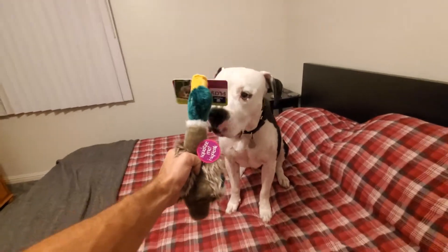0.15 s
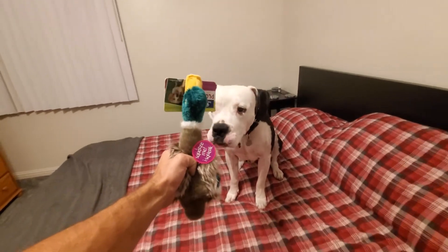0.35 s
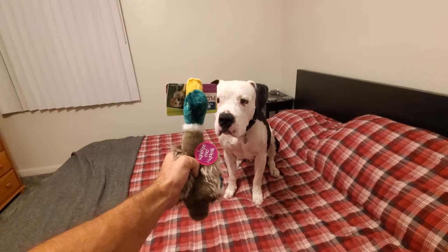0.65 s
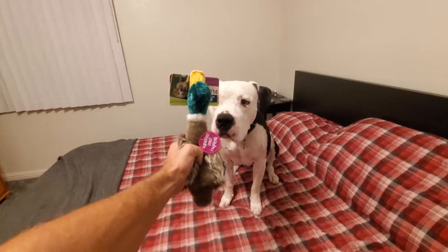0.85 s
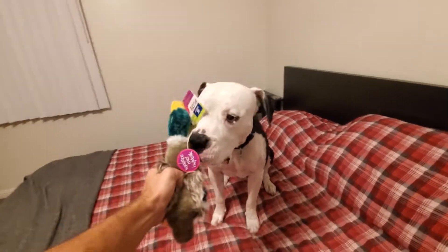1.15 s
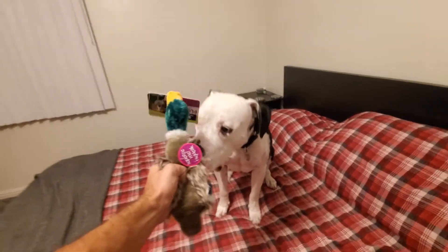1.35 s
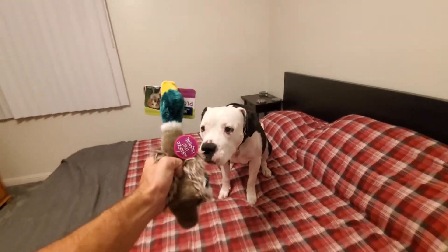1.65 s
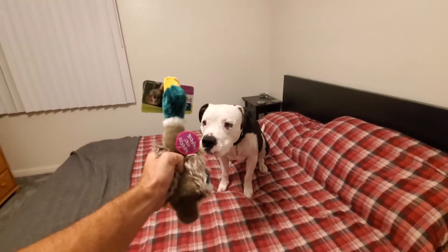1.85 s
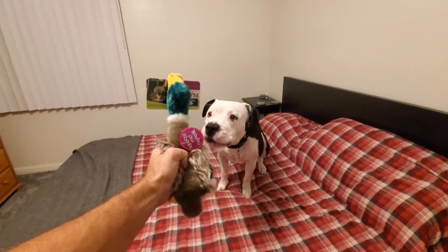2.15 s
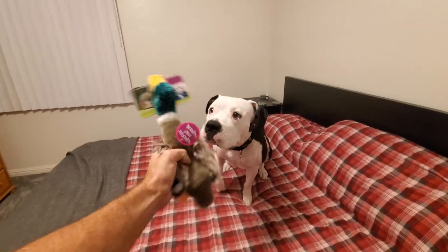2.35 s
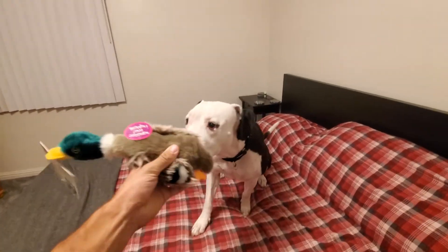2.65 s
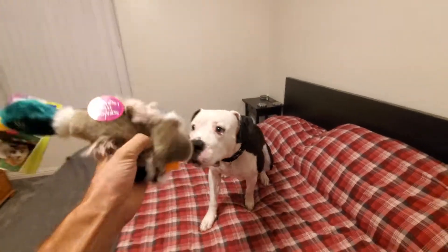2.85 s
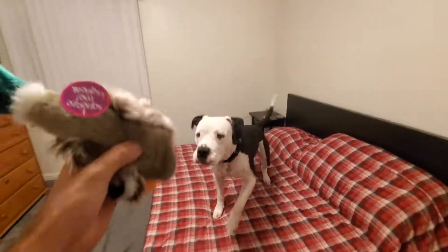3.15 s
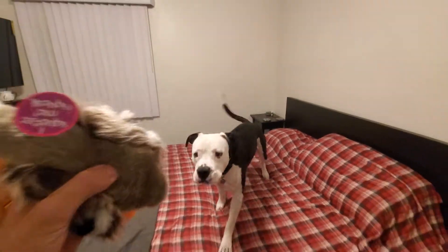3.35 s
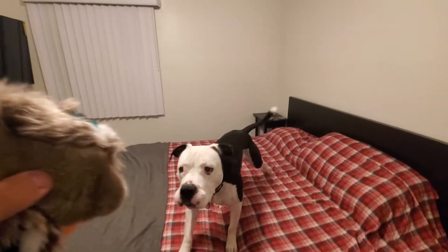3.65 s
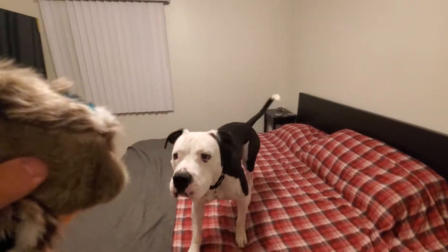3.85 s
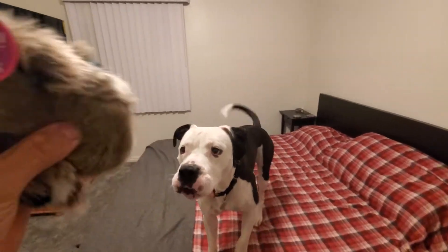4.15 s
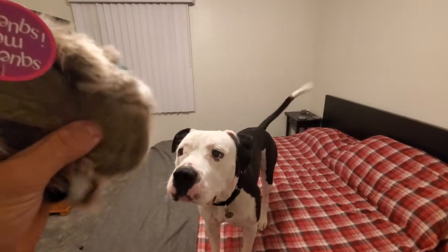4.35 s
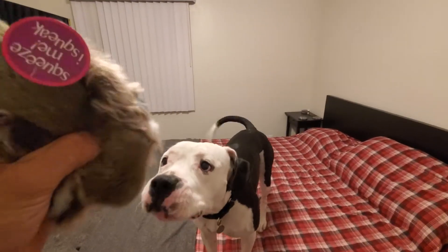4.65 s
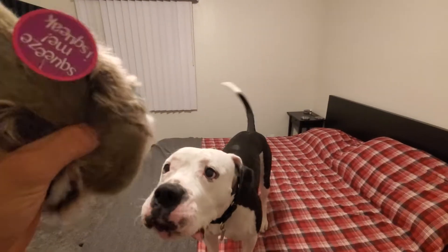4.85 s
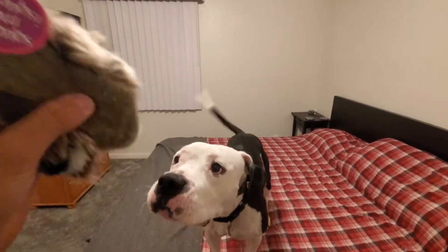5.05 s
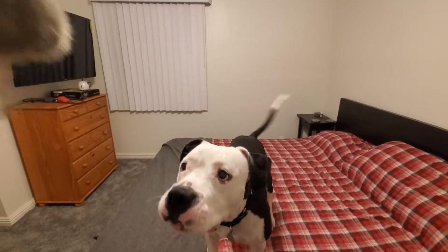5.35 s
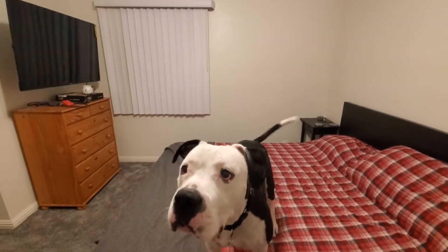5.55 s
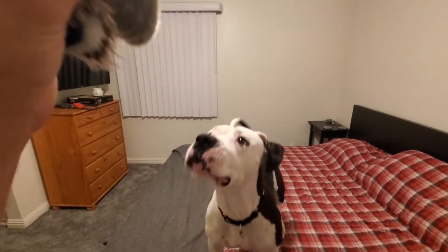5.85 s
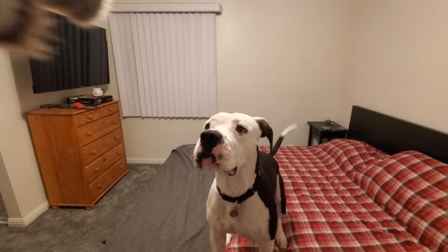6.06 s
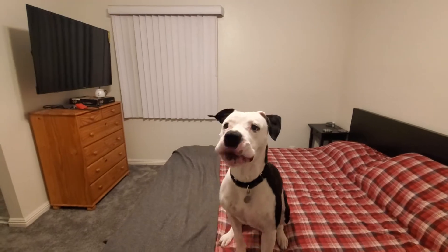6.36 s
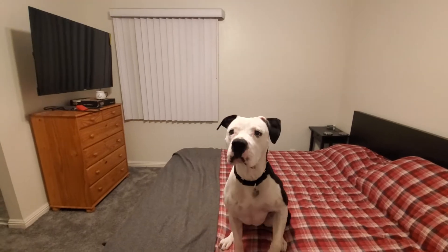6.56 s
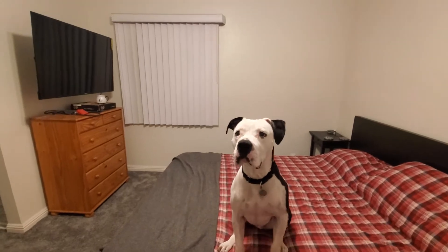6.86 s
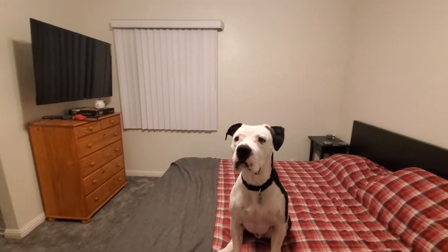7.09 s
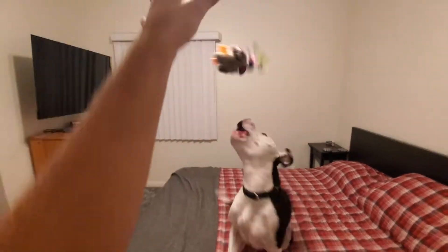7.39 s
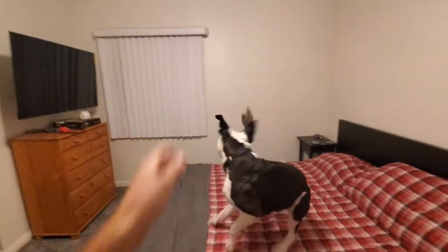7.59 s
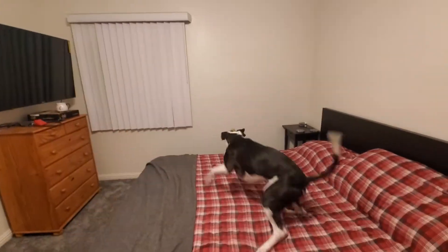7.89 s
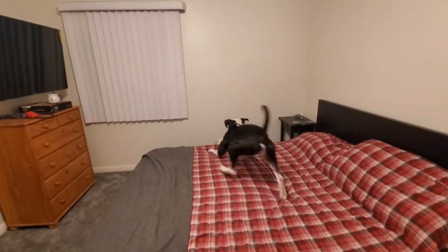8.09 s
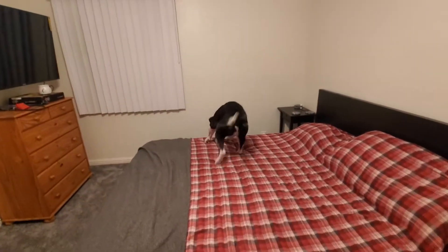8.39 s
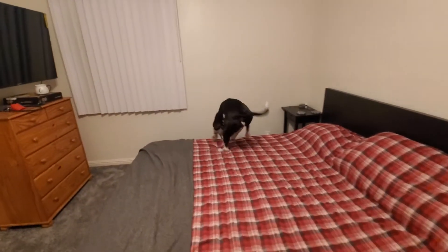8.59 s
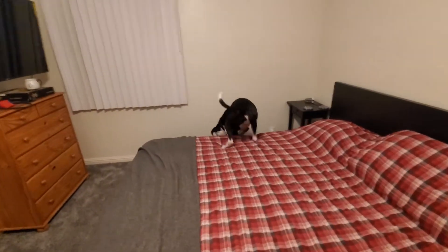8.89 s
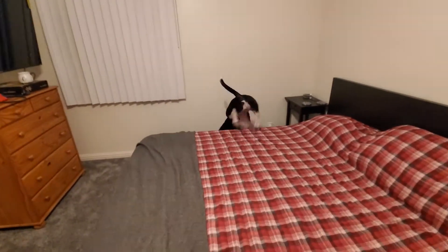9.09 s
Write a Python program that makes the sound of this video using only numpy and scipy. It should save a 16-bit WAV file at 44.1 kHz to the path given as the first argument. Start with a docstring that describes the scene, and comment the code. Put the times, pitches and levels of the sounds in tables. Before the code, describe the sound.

Paws thump a mattress and fabric rustles, then short rising toy squeaks, alone and in a quick run; the tossed toy flops down amid faint jingling.

```python
"""Cloth rustle, ticks of a card label and paw thumps on a mattress open the scene, in a small bedroom.
A plush duck's reed squeaker is then squeezed nine times close by: harmonics of a gliding pitch plus reed hiss.
The toy is thrown: the dog jumps, its collar tags jingle (ringing modes), the toy lands with a noise slap.
Cloth is gated, resonated noise; thumps are decaying sines; most near sounds also feed a synthetic room tail.
Table levels are relative: each function adds its own trim."""
import sys
import numpy as np
from scipy import signal
from scipy.fft import rfft, irfft, next_fast_len
from scipy.io import wavfile
from scipy.ndimage import uniform_filter1d, minimum_filter1d

SR = 44100
rng = np.random.default_rng(int(sys.argv[2]) if len(sys.argv) > 2 else 0)


def store_pcm(level_fs):
    """Save levels as 16-bit WAV."""
    pcm = np.round(np.clip(level_fs, -1, 1) * 32767).astype(np.int16)
    wavfile.write(sys.argv[1], SR, np.atleast_2d(pcm).T)


N = 407043
TIME = np.arange(N) / SR

# hand squeezes: start_s, rise_s, let_go_s (both after start), top_hz (before any register jump),
# level_db, left_right_db, room_send_db
SQUEEZES = [ (2.752, .041, .043, 1525, -11.3, -3.5, 1.5), (2.976, .032, .038, 1790, -8.8, -3.5, 1),
            (3.987, .032, .047, 1765, -10.6, -1, 0), (4.199, .027, .048, 1675, -10, -1, -1),
            (4.395, .028, .050, 1785, -10, -2.5, -.5), (4.589, .035, .052, 1680, -10, -1, -1.5),
            (4.785, .031, .055, 1600, -10.2, 0, 0), (5.601, .042, .051, 2010, -6.7, 1, -5),
            (7.140, .036, .049, 2400, -7.2, 1, -2.5)]
# side the bass comes from: time_s, left_right_db
BASS_LEAN = [(0, 12.5), (3.1, 9), (4.5, 1), (8.35, -1), (8.7, 5), (8.95, 7.5), (9.08, -4)]


def from_db(db):
    """Decibels to gain."""
    return 10 ** (np.asarray(db) / 20)


def rms_one(x):
    """Scale to an rms of 1."""
    return x / np.sqrt(np.mean(x ** 2) + 1e-20)


def at_hz(points, hz):
    """Read a (Hz, value) table on a log-frequency axis."""
    f, value = np.transpose(points)
    return np.interp(np.log(np.maximum(hz, 1)), np.log(f), value)


def in_time(curve, s=TIME):
    """Read a (s, value) curve."""
    return np.interp(s, *np.transpose(curve))


def pan(db):
    """Left and right gains for a level difference."""
    return from_db(np.array([[db], [-db]]) / 2)


def add(out, s, x):
    """Mix x into out from time s on."""
    i = max(0, round(s * SR))
    out[..., i:i + x.shape[-1]] += x[..., :N - i]


def drift(rate_hz, n):
    """Slow chance: straight lines between random knots of spread 1."""
    knots = rng.standard_normal(int(n / SR * rate_hz) + 3)
    return np.interp(np.arange(n) / SR * rate_hz, np.arange(len(knots)), knots)


def colour(x, spectrum):
    """Give x a (Hz, dB) spectrum that falls away beyond its ends; rms 1."""
    size = next_fast_len(x.shape[-1])
    f = np.fft.rfftfreq(size, 1 / SR) + 1
    skirts = np.minimum(1, f / spectrum[0][0]) ** 3 * np.minimum(1, spectrum[-1][0] / f) ** 3
    shaped = irfft(rfft(x, size) * from_db(at_hz(spectrum, f)) * skirts, size)
    return rms_one(shaped[..., :x.shape[-1]])


def resonate(x, hz, width_hz):
    """One resonance of the given bandwidth."""
    return signal.lfilter(*signal.iirpeak(hz, hz / width_hz, fs=SR), x)


def stereo_noise(n, alike_below_hz):
    """Diffuse noise: alike at both ears in the bass, unrelated in the treble."""
    mid, side = rng.standard_normal((2, n))
    low, high = (signal.butter(1, alike_below_hz, kind, fs=SR) for kind in ("low", "high"))
    bass = signal.lfilter(*low, rng.standard_normal(n))
    wide = signal.lfilter(*high, side) * np.array([[1], [-1]])
    return (mid + bass + wide) / np.sqrt(2)


def struck(modes, t):
    """One blow: every (Hz, dB, t60 s) mode rings with a strength of its own."""
    return sum(from_db(db + 2 * rng.standard_normal() - 60 * t / t60) * np.sin(2 * np.pi * hz * t)
               for hz, db, t60 in modes)


def squeaker(toy_db=0.7, overtones_side_db=0.5, start_hz=1225, sag_hz_per_s=2800):
    """Each squeeze climbs from one pitch to its own top, then sags until let go; direct sound and room send."""
    # share of the climb done at half time, less for hard squeezes: top_hz, share
    climb_bow = [(1700, .63), (2400, .47)]
    # lead of the left channel as the toy swings: time_s, lead_s
    left_lead = [(2.75, .00028), (2.98, .00033), (3.98, .000385), (4.8, .00039), (7.14, .00037)]
    direct, sent = np.zeros((2, 2, N))
    for s, rise, let_go, top, db, side_db, room_db in SQUEEZES:
        halfway = start_hz + at_hz(climb_bow, top) * (top - start_hz)
        pitches = start_hz, halfway, top, top - sag_hz_per_s * (let_go - rise)
        overtones = pan(overtones_side_db - side_db)
        reed = squeak(rise, let_go, pitches, overtones, in_time(left_lead, s))
        sound = from_db(db + toy_db) * pan(side_db) * reed
        add(direct, s, sound)
        add(sent, s, from_db(room_db) * sound)
    return direct, sent


def squeak(rise, let_go, pitches, overtones, lead, slack_hz=1080, slump_s=0.0053, fade_s=0.0057,
           attack_s=0.0016, jitter=0.0028, waver_db=4.0, hiss_db=-21, dulling=0.26, rasp_rad=0.064,
           pure_db=-9, start_db=-3, jump_hz=2330, jump_ratio=1.125, beam_order=4):
    """Air pressure drives the reed up in pitch; on letting go the pitch slumps and the overtones die first."""
    # radiation through the plush: pitch_hz, level_db
    radiated = [(1000, -9.5), (1250, -3.5), (1500, -3), (2150, -1), (2480, -10.5), (2750, -7),
                (3100, -15.5), (3550, -7), (4200, -13.5), (7400, -18.5), (8800, -24.5), (9600, -32),
                (14500, -34), (16500, -38.5)]
    # air hissing past the reed: pitch_hz, level_db
    reed_hiss = [(1100, -11), (1500, -4), (2050, -11.5), (2900, -2), (4200, 5.5), (7500, 12), (9500, -10),
                 (15000, -15)]
    t = np.arange(round((let_go + 2 * 0.022) * SR)) / SR
    start, halfway, top, end = pitches
    rising = np.minimum(t / rise, 1)
    climb = np.polyval(np.polyfit([0, .5, 1], [start, halfway, top], 2), rising)
    held = climb + (end - top) * np.clip((t - rise) / max(let_go - rise, 1e-3), 0, 1)
    # once blown above jump_hz the reed stays in a higher register
    held = np.where(np.maximum.accumulate(held) > jump_hz, held * jump_ratio, held)

    after = np.maximum(t - let_go, 0)
    pressure = np.exp(-after / slump_s)
    hz = (slack_hz + (held - slack_hz) * pressure) * (1 + jitter * drift(900, len(t)))
    attack = (1 - np.exp(-t / attack_s)) * from_db(start_db * (1 - rising))
    blow = attack * np.exp(-(after / fade_s / 2) ** 2)

    # the reed shuts early or late on each cycle, which frays the high overtones
    phase = 2 * np.pi * np.cumsum(hz) / SR + rasp_rad * drift(1600, len(t))
    lagged = phase - 2 * np.pi * hz * np.array([[0], [lead]])
    hiss = colour(rng.standard_normal((2, len(t))), reed_hiss)
    out = from_db(hiss_db) * hiss * (1 + .5 * np.cos(lagged))
    # hard blowing gives a purer whistle
    overtones = overtones * from_db(pure_db * np.clip(held / 1900 - 1, 0, .5) * 2)
    for k in np.arange(1, 14):
        # each ear gets its own wavering share; the spread stops growing at beam_order
        spread_db = waver_db * np.sqrt(min(k, beam_order) - 3 / 4)
        beam = spread_db * np.array([drift(130, len(t)), drift(150, len(t))])
        share = 1 if k == 1 else overtones * pressure ** (dulling * (k - 1))
        level = share * from_db(at_hz(radiated, k * hz) + beam) * (k * hz < SR / 2)
        out += np.sqrt(2) * level * np.sin(k * lagged)
    return out * blow


def intakes(delay_s=0.066, length_s=.035, intake_db=-47):
    """A moment after each squeeze the bulb springs back and draws air in with a faint hiss."""
    # air drawn into the bulb: pitch_hz, level_db
    intake_colour = [(1500, -12), (3500, -2), (7000, -2), (11000, -3.5), (16000, -8)]
    out, t = np.zeros((2, N)), np.arange(SR // 4) / SR
    swell = np.exp(-(2 * (t - delay_s) / length_s) ** 2)
    for s, _, let_go, *_ in SQUEEZES:
        hiss = colour(rng.standard_normal((2, len(t))), intake_colour)
        add(out, s + let_go, from_db(intake_db) * swell * hiss)
    return out


def cloth(rub_db=-1, grain_db=2.0, snag_db=-9, snags_per_s=250, scrape_db=-7, wander_db=5, treble_hz=4500):
    """Fibres rub in a grainy hiss, snag now and then, and scrape with a shifting colour."""
    # resonances of the weave: pitch_hz, width_hz
    weave = [(1350, 1400), (2300, 360), (2750, 210), (3150, 300), (3600, 1600), (5200, 570), (7200, 2000)]
    # rubbing spectrum: pitch_hz, level_db
    rub_colour = [(350, -31), (600, -8.5), (1180, -5), (1750, -1.5), (2070, -2), (2870, -1.5), (4520, -7.5),
                  (7410, -11), (15100, -19), (16000, -32)]
    hiss = stereo_noise(N, 570) * from_db(grain_db * drift(200, N))
    snag_chance = snags_per_s * from_db(5 * drift(20, N)) / SR
    snags = (rng.random(N) < snag_chance) * rng.laplace(0, 1, (2, N))
    friction = rms_one(hiss) + from_db(snag_db) * rms_one(snags)
    scrapes = sum(resonate(friction, hz, width) * from_db(wander_db * drift(16, N)) for hz, width in weave)
    rub = colour(friction + from_db(scrape_db) * rms_one(scrapes), rub_colour)
    highs = signal.sosfiltfilt(signal.butter(2, treble_hz, "high", fs=SR, output="sos"), rub)
    body, treble = rubbing_gains()
    return from_db(rub_db) * (body * (rub - highs) + treble * highs) * pan(1.8)


def rubbing_gains(decay_db_per_s=150.5):
    """Strokes swell and die away on top of the resting contact, in power; gains of body and treble."""
    # plush sliding on hand, muzzle and bedding: time_s, level_db
    contact = [(0, -49.5), (.35, -63), (.76, -66.5), (1.02, -43), (1.8, -50), (2.22, -58), (2.55, -53),
               (3.15, -47.5), (3.65, -69.5), (4.9, -59), (5.55, -72), (6.4, -63), (6.95, -78.5), (7.6, -55),
               (8.55, -65), (9.23, -54.5)]
    # single strokes of cloth: peak_s, rise_s, level_db, treble_db (relative to the body)
    strokes = [(.085, .015, -45.5, -3), (.295, 0.01, -48.5, -11), (.48, 0.036, -54, -10),
               (.575, 0.016, -51.5, 4.5), (.88, 0.025, -50.5, 2.5), (1.01, 0.03, -43.5, 8.5),
               (1.21, 0.02, -43, -3), (1.28, 0.021, -39.5, -20), (1.36, 0.0082, -31.5, -10),
               (1.525, .02, -40, -3.5), (1.68, 0.036, -41.5, -21), (1.77, 0.089, -42, -26),
               (1.85, 0.018, -41.5, 0), (2.006, 0.02, -42.5, 3), (2.28, .03, -51.5, -17),
               (2.415, 0.035, -39.5, 5), (2.516, .015, -39, 6), (2.57, .02, -43.5, 0), (2.735, .02, -40, 3),
               (3.769, 0.046, -52, -8), (5.2, .03, -53, -3.5), (5.336, 0.016, -52.5, -2),
               (6.25, 0.067, -52, 0), (7.465, 0.0073, -45.5, -8), (7.785, 0.044, -52, 9),
               (8.098, 0.013, -34, 0), (8.719, 0.037, -47, -22), (9.12, 0.087, -51, -0.5)]
    body = treble = from_db(in_time(contact)) ** 2
    for s, rise, db, treble_db in strokes:
        swell = np.exp(-2 * (np.minimum(TIME - s, 0) / rise) ** 2)
        power = swell * from_db(db - decay_db_per_s * np.clip(TIME - s, 0, 1)) ** 2
        body, treble = body + power, treble + power * from_db(treble_db) ** 2
    return np.sqrt(body), np.sqrt(treble)


def ticks(t60=.012, tick_db=-8, ring_db=-4, width=0.13):
    """Label, plastic and teeth: each tick is a short crack with a broad resonance of its own."""
    # ticks: start_s, level_db, pitch_hz
    tick_list = [(0.074, -11.5, 2140), (1.1034, -24, 3660), (1.1356, -20, 2430), (1.3568, -35, 2890),
                 (2.348, -33, 2800), (2.387, -23.5, 2360), (2.4078, -16.5, 2980), (2.504, -13, 3150),
                 (2.544, -27, 3110), (2.6267, -29, 3030), (2.7164, -24, 5610), (2.738, -30, 2550),
                 (2.913, -27.5, 1530), (3.254, -17.5, 1796), (3.325, -24, 2480), (3.4672, -32.5, 2330),
                 (4.965, -28, 3480), (5.09, -35, 9100), (5.1502, -21, 12100), (5.76, -25, 10800),
                 (5.7666, -19, 1990), (5.778, -18.5, 1980), (5.9494, -32, 1975), (6.049, -36, 6800),
                 (6.104, -41, 2920), (6.6609, -42, 3330), (7.4634, -37.5, 2650)]
    # crack spectrum: pitch_hz, level_db
    tick_colour = [(290, -53), (500, -27), (2930, -7.5), (4280, -7), (5470, -6.5), (6900, -10),
                   (9630, -7.5), (16000, -12)]
    out, t = np.zeros((2, N)), np.arange(SR // 10) / SR
    for s, db, hz in tick_list:
        crack = colour(rng.standard_normal((2, len(t))), tick_colour)
        ring = rms_one(resonate(crack, hz, width * hz))
        add(out, s, from_db(db + tick_db - 60 * t / t60) * (crack + from_db(ring_db) * ring))
    return out * pan(1.9)


def slaps(attack_s=0.0035):
    """The toy lands and is nudged: plush and card slap in a burst of coloured noise."""
    # landings: start_s, level_db, t60_s
    landings = [(8.091, -30, 0.17), (8.472, -51.5, 0.13)]
    # slap spectrum: pitch_hz, level_db
    slap_colour = [(180, -41), (300, -20), (478, -15), (565, -26.5), (930, -3), (2100, -33), (2440, 1.5),
                   (2610, -21), (2930, -5), (16000, -26.5)]
    out, t = np.zeros((2, N)), np.arange(SR // 2) / SR
    for s, db, t60 in landings:
        envelope = from_db(db - 60 * t / t60) * (1 - np.exp(-t / attack_s))
        add(out, s, envelope * colour(stereo_noise(len(t), 870), slap_colour))
    return out * pan(-4.0)


def collar(shake_s=0.028, touch_db=-6, others_db=-15, reach_hz=350, count=3, chatter_db=-7,
           chatter_width_hz=350, chatter_t60=0.29):
    """A tag touches a few times and chatters on its ring; the spot hit decides which modes are favoured."""
    # tag touches: start_s, level_db, favoured_hz
    jingles = [(7.648, -40.5, 10030), (7.69, -46, 11700), (7.788, -36.5, 11580), (7.808, -47, 7100),
               (7.835, -47.5, 11450), (8.659, -51.5, 10940), (8.725, -58, 11200)]
    # tag modes: pitch_hz, level_db, t60_s
    tags = [(6560, -4, 0.18), (6900, -2.5, 0.13), (9300, -13, 0.2), (10030, -14, 0.14), (10840, 7, 0.1),
            (11420, 2.5, 0.39), (11500, 3, 0.32)]
    out, t = np.zeros((2, N)), np.arange(SR // 2) / SR
    soft = 1 - np.exp(-t / .003)
    for s, db, main_hz in jingles:
        modes = []
        for hz, level, t60 in tags:
            remoteness = 1 - np.exp(-((hz - main_hz) / reach_hz) ** 2)
            modes.append((hz, level + others_db * remoteness, t60))
        for delay in shake_s * (np.arange(count) * rng.uniform(0.52, 1.0, count)):
            ring = np.array([struck(modes, t), struck(modes, t)])
            add(out, s + delay, from_db(db + touch_db) * soft * ring)
        contacts = (rng.random((2, len(t))) < 500 / SR) * rng.standard_normal((2, len(t)))
        chatter = rms_one(resonate(contacts, main_hz, chatter_width_hz))
        add(out, s, from_db(db + chatter_db - 60 * t / chatter_t60) * soft * chatter)
    return out


def mattress(handling_colour, t60=0.14, attack_s=0.0051, thump_db=-1, second_db=-9, frame_db=-4,
             frame_t60=0.26, puff_db=-2):
    """A soft blow bounces the mattress in two modes, rings the frame and puffs the bedding."""
    # paws and body: start_s, level_db, pitch_hz, frame_knock_db
    thumps = [(0.171, -28, 70, -22), (.324, -28, 61.7, -21), (0.815, -22, 65, -28), (0.879, -29, 79.5, -16),
              (0.945, -20, 82.4, -15), (1.068, -16, 77, -5), (1.148, -26, 79.6, -0.5),
              (1.354, -32.5, 100, 2), (1.605, -20.5, 60.6, -24), (1.688, -27.5, 61.5, -10.5),
              (2.358, -28.5, 74, -16), (2.488, -36, 50, -17), (2.533, -24, 83, -14.5),
              (3.071, -24.5, 46.3, -25), (7.627, -24, 173, -6), (7.768, -27, 73, -10.5),
              (8.043, -28, 74.6, -4.5), (8.768, -27.5, 64, -14), (8.947, -23.5, 47.4, -36)]
    # bed frame modes: pitch_hz, level_db, t60_s (shortened further by frame_t60)
    bed = [(134, 9, 0.276), (236.5, 1, 0.23), (282, 0.5, 0.2), (384, -3, 0.2), (427.4, -1, 0.28),
           (481, -25, .2)]
    out, t = np.zeros((2, N)), np.arange(SR // 2) / SR
    swell = 1 - np.exp(-t / attack_s)
    for s, db, hz, knock_db in thumps:
        turn = 2 * np.pi * hz * t
        two_modes = np.sin(turn) - from_db(second_db) * np.sin(1.6 * turn)
        bounce = from_db(thump_db - 60 * t / t60) * two_modes
        puff = from_db(puff_db) * colour(stereo_noise(len(t), 780), handling_colour)
        knock = from_db(frame_db + knock_db - 60 * t / frame_t60) * (0.66 * struck(bed, t) + puff)
        add(out, s, from_db(db) * swell * (bounce * pan(in_time(BASS_LEAN, s)) + knock))
    return out


def bumps(t60=0.059, attack_s=0.0028, bump_db=-4, width=.4):
    """A soft touch of toy or hand sets one broad, low resonance going."""
    # hollow bumps: start_s, level_db, pitch_hz
    touches = [(.275, -33.5, 433), (4.155, -40, 370), (4.347, -33, 404), (4.555, -44, 340),
               (4.933, -29.5, 390), (5.02, -40, 473), (5.09, -39.5, 430), (5.61, -52, 430),
               (5.722, -49, 480), (7.283, -30, 490)]
    out, t = np.zeros((2, N)), np.arange(SR // 5) / SR
    for s, db, hz in touches:
        edges_hz = [hz / (1 + width / 2), hz * (1 + width / 2)]
        body = signal.butter(2, edges_hz, "band", fs=SR, output="sos")
        hollow = rms_one(signal.sosfilt(body, stereo_noise(len(t), 900)))
        add(out, s, from_db(db + bump_db - 60 * t / t60) * (1 - np.exp(-t / attack_s)) * hollow)
    return out


def movement(handling_colour, mean_rumble_db=-61.5, rumble_follows=0.83, heave_rumble_db=1,
             heave_bedding_db=1, stir_db=1, lump_db=3.5, crumple_db=3):
    """The mattress heaves in lumps under the dog, and bedding and plush are pushed about."""
    # stirring of bedding and plush: time_s, soft_noise_db
    stir_curve = [(0.0, -52.5), (0.74, -57), (1.16, -49.5), (2.18, -53.5), (2.6, -51.5), (3.96, -62.5),
                  (4.19, -57.5), (5.04, -58), (5.42, -64), (6.48, -64.5), (6.94, -67), (7.56, -53.5),
                  (8.04, -61), (8.17, -58), (8.64, -56.5), (9.23, -53)]
    # weight shifts: middle_s, length_s, rumble_db, bedding_db
    heaves = [(0.266, 0.18, -41, -60), (0.914, 0.15, -35, -57), (1.118, 0.087, -36, -42),
              (1.244, 0.18, -38, -54), (1.407, 0.13, -43.5, -45.5), (1.737, .35, -43.5, -57),
              (2.072, 0.13, -45.5, -48.5), (2.518, 0.12, -34.5, -53.5), (3.098, .12, -37, -57),
              (3.492, 0.053, -50, -54.5), (5.066, 0.15, -52.5, -56.5), (6.296, 0.15, -61, -55.5),
              (7.488, .12, -46, -56.5), (7.812, 0.13, -42.5, -63), (8.275, 0.23, -44.5, -50),
              (8.941, 0.23, -36.5, -60), (9.143, 0.18, -47, -46)]
    # mattress bounce spectrum: pitch_hz, level_db
    rumble_colour = [(36, -10), (50, 5.5), (78, 1.5), (100, -4), (155, -14.5), (210, -18), (260, -26.5)]
    stir = in_time(stir_curve)
    rumble_power = from_db(mean_rumble_db + rumble_follows * (stir - stir.mean())) ** 2
    handling_power = from_db(stir + stir_db) ** 2
    for s, length, low_db, bedding_db in heaves:
        swell = np.exp(-(2 * (TIME - s) / length) ** 2)
        rumble_power = rumble_power + swell * from_db(low_db + heave_rumble_db) ** 2
        handling_power = handling_power + swell * from_db(bedding_db + heave_bedding_db) ** 2
    lumps = stereo_noise(N, 56) * from_db(lump_db * drift(25, N))
    low = colour(lumps, rumble_colour) * from_db(in_time(BASS_LEAN) * np.array([[1], [-1]]) / 2)
    soft = colour(stereo_noise(N, 600) * from_db(crumple_db * drift(40, N)), handling_colour)
    return low * np.sqrt(rumble_power) + soft * np.sqrt(handling_power)


def still_air(air_db=-66.5):
    """Steady coloured noise of the still room."""
    # room noise spectrum: pitch_hz, level_db
    air_colour = [(15, -54), (25, -25), (70, -27), (111, -3.5), (145, -27.5), (236, -5.5), (301, -22.5),
                  (344, -9), (575, -24), (695, -26.5), (16000, -58)]
    return from_db(air_db) * colour(stereo_noise(N, 500), air_colour)


def bedroom(x, first_echo_s=0.0017, build_s=0.00088, echo_db=13, treble_db_per_octave=3.0):
    """Sparse early wall echoes and a diffuse tail that dies band by band."""
    # decay: pitch_hz, t60_s
    room_t60 = [(100, .3), (800, 0.37), (1800, 0.52), (3500, 0.37), (7000, 0.44), (15000, 0.27)]
    t = np.arange(round(SR * .7)) / SR
    impulses = (rng.random((2, len(t))) < 400 / SR) * rng.standard_normal((2, len(t)))
    echoes = impulses * np.exp(-t / .025)
    spectrum = rfft(stereo_noise(len(t), 1200) + from_db(echo_db) * echoes)
    f, centres = np.fft.rfftfreq(len(t), 1 / SR), np.geomspace(100, 16000, 12)
    tail = 0
    for hz, share in zip(centres, np.eye(len(centres))):
        band = irfft(spectrum * np.interp(f, centres, share), len(t))
        lift_db = treble_db_per_octave * np.log2(np.clip(hz / 2000, 1, 4))
        tail = tail + band * from_db(lift_db - 60 * t / at_hz(room_t60, hz))
    tail = tail * (1 - np.exp(-np.maximum(t - first_echo_s, 0) / build_s))
    return signal.fftconvolve(x, tail / np.sqrt(np.sum(tail ** 2) / 2), axes=1)[:, :N]


def scene():
    """Toy, cloth, slaps and tags also feed the room; thumps, bumps, movement and air stay dry."""
    # bedding noise spectrum: pitch_hz, level_db
    handling_colour = [(120, -3), (170, -1), (320, -3), (550, -9.5), (900, -12.5), (1500, -19)]
    toy, toy_sent = squeaker()
    small = ticks() + cloth() + intakes()
    far = slaps() + collar()
    room = bedroom(from_db(-6.5) * toy_sent + from_db(-7) * small + from_db(-2) * far)
    bed = mattress(handling_colour) + movement(handling_colour)
    return toy + small + from_db(3) * far + room + bed + bumps() + still_air()


def record(dry, ceiling=0.83, cutoff_hz=16000):
    """The deepest bass is thinned, a fast limiter holds the peaks and the top is cut."""
    thinned = signal.sosfilt(signal.butter(1, 25, "high", fs=SR, output="sos"), dry)
    allowed = np.minimum(1, ceiling / (np.abs(thinned).max(axis=0) + 1e-9))
    gain = uniform_filter1d(minimum_filter1d(allowed, size=265), size=221)   # sizes in samples
    top_cut = signal.ellip(10, .2, 70, cutoff_hz, fs=SR, output="sos")
    return signal.sosfilt(top_cut, thinned * gain)


dry = scene()
out = record(dry)
store_pcm(out)
```